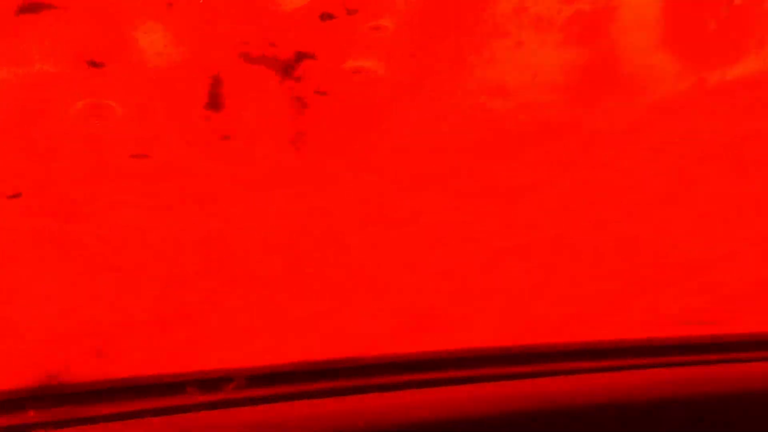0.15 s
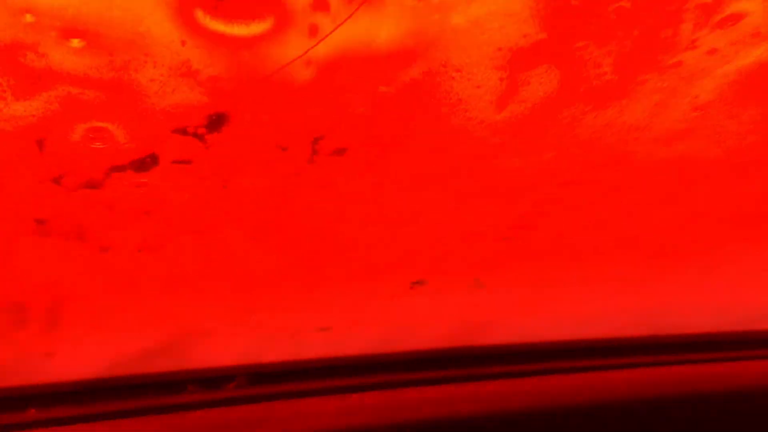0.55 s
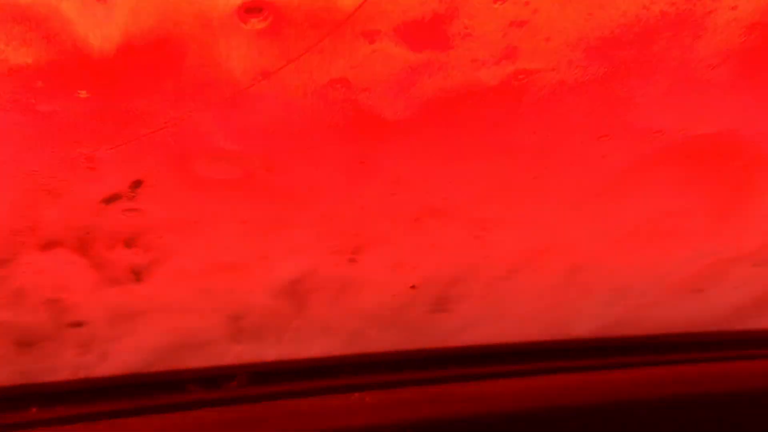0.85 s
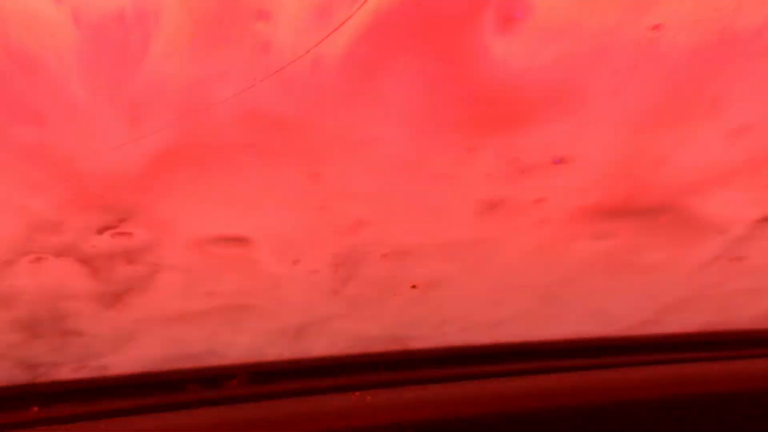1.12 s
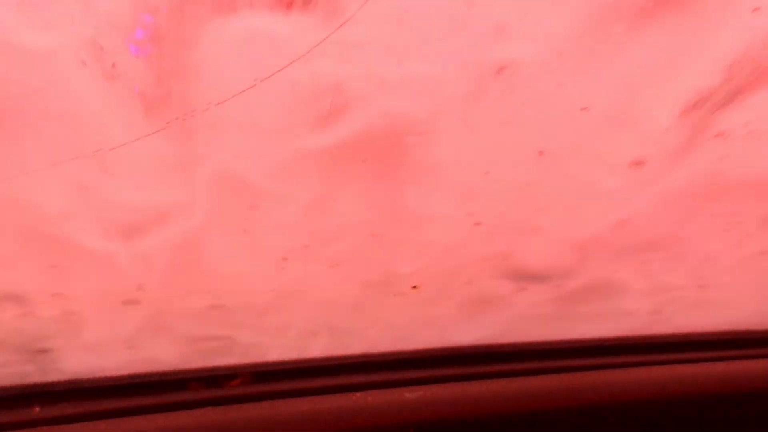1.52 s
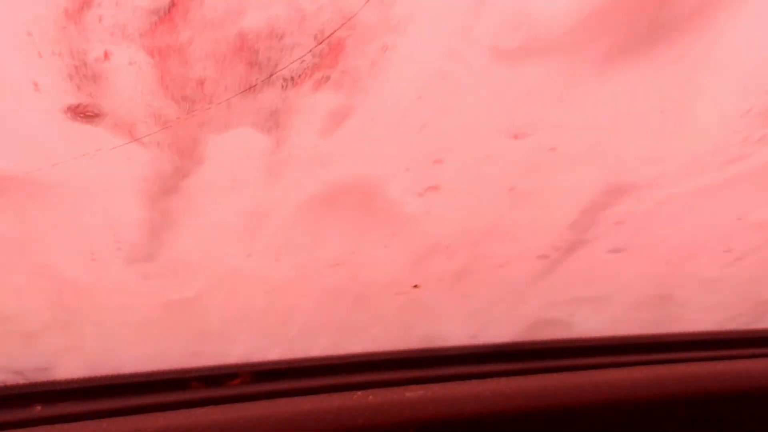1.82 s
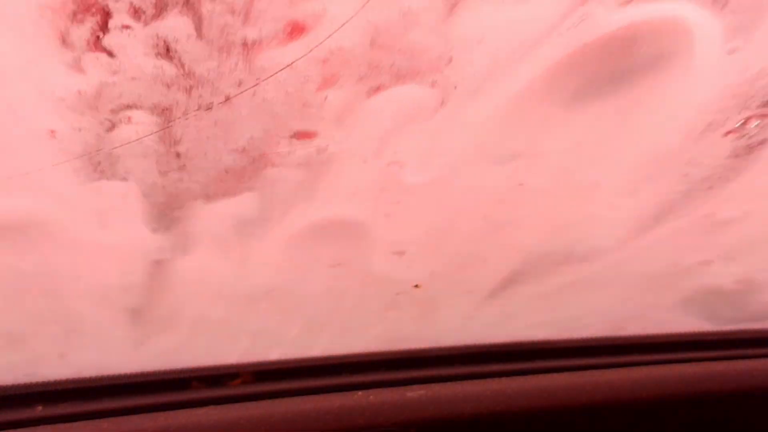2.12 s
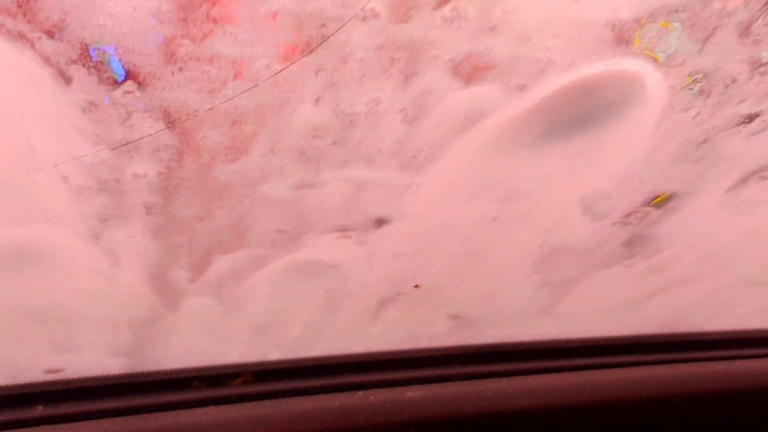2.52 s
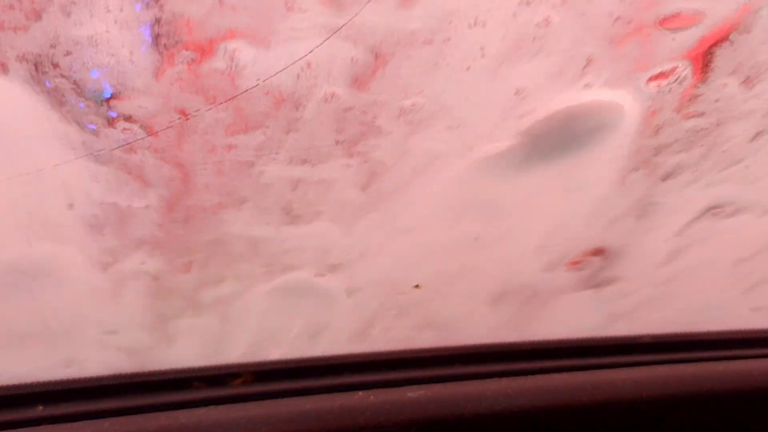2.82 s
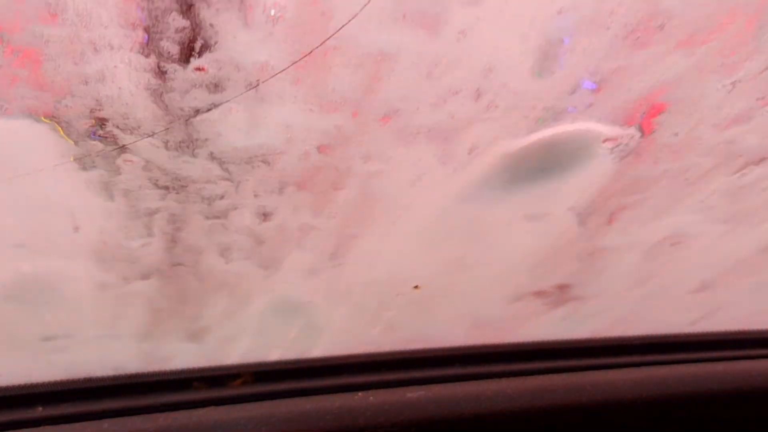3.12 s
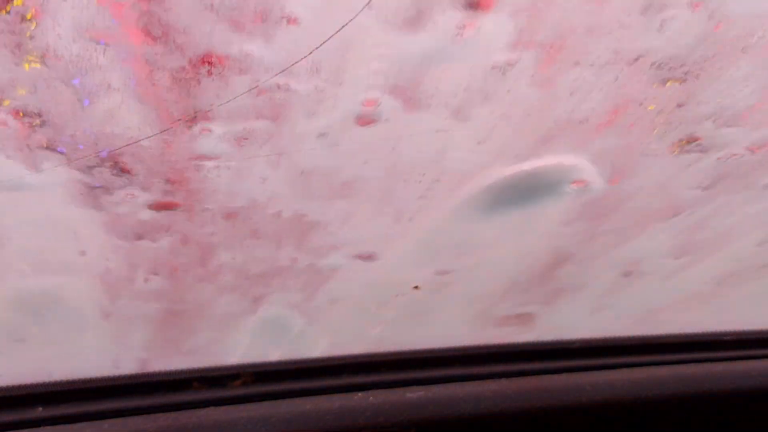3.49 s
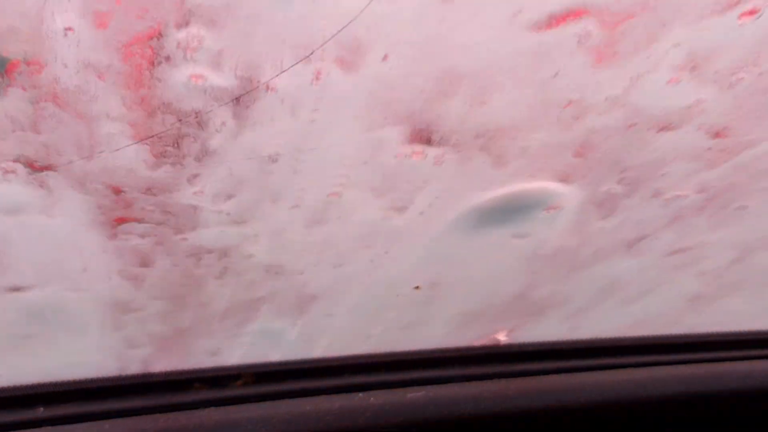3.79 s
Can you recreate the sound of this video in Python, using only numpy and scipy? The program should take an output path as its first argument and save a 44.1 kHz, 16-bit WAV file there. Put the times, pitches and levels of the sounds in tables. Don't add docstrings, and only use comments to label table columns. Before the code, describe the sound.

Car wash machinery rumbles low around a closed cabin while foam and water patter on the windscreen

```python
import sys
import numpy as np
from scipy import signal
from scipy.fft import rfft, irfft
from scipy.io import wavfile
from scipy.ndimage import uniform_filter1d

SR = 44100
rng = np.random.default_rng(int(sys.argv[2]) if len(sys.argv) > 2 else 0)


def linear_from_db(decibels):
    return 10 ** (np.asarray(decibels, float) / 20)


def transcribe(u):
    v = np.clip(np.atleast_2d(u).T, -1, 1)
    q = np.round(v * 32767).astype(np.int16)
    wavfile.write(sys.argv[1], SR, q)


N = 174195

# [t/s, rumble level/dB, spray level/dB]
MACHINERY = [(0.0, -41.5, -57.5), (0.45, -40, -58.5), (0.85, -40.5, -59.5), (1.2, -41.5, -59),
             (1.43, -39, -58.5), (1.462, -46.5, -58.5), (1.485, -38.5, -58.5), (1.95, -39, -57),
             (2.22, -40, -56), (2.5, -39.5, -57), (2.75, -39, -58), (2.9, -38, -57.5), (3.16, -40, -57),
             (3.23, -38, -56), (3.6, -38.5, -57.5), (3.95, -37.5, -57.5)]
# [f/Hz, level per Hz/dB]
BODY_COLOUR = [(8.8, -32), (15, 6), (32, 1), (92, -3), (188, -2.5), (430, -11.5), (471, -13), (566, -17.5),
               (1200, -30), (1560, -29), (2640, -120)]
# [f/Hz, width/Hz, level/dB]
CABIN_BOOMS = [(27.4, 8.5, -1), (39, 2.3, -5), (62, 26, 1.5), (178, 14.5, 2.5), (251, 72, 5), (780, 4.8, 0),
               (1500, 800, 2.5)]
# [f/Hz, level per Hz/dB]
SPRAY_COLOUR = [(300, -11), (700, 1.5), (1600, -8), (2000, -14.5), (3800, -15.5), (6500, -25.5),
                (10000, -27.5), (14500, -35.5)]
# [t/s, level/dB]
MIST_LEVEL = [(0.0, -62.5), (0.79, -68.5), (1.8, -71.5), (2.3, -73), (2.8, -73), (3.3, -75), (3.95, -72)]
# [t/s, peak level/dB, pitch f/Hz, pan/dB]
FOAM_SPLATS = [(1.0071, -48, 1670, 4), (1.0883, -41.5, 1240, 2), (1.2024, -45, 2280, 4),
               (1.355, -47.5, 3400, -4), (1.4982, -50.5, 4330, 5), (1.6042, -44, 4360, 9),
               (1.866, -45.5, 2400, 2), (1.927, -39.5, 2760, 7), (2.0916, -60, 2400, 2),
               (2.1176, -47, 3020, 4), (2.1579, -44.5, 3370, 2), (2.195, -50, 3500, 5),
               (2.243, -42, 3260, 0), (2.2972, -43, 2270, 4), (2.2822, -50, 1700, 3), (2.32, -47, 3070, 6),
               (2.355, -47, 1700, 4), (2.387, -37, 3420, 1), (2.453, -46, 1800, 6), (2.6479, -50, 1700, 3),
               (2.7018, -47, 2800, -1), (2.7342, -45.5, 1980, 5), (2.68, -41.5, 2720, 1),
               (2.772, -49, 3200, 5), (2.806, -41, 2700, 1), (2.864, -40.5, 2250, 2),
               (2.8984, -46, 1700, 1), (2.934, -45, 2130, -2), (2.9582, -41, 3700, 2),
               (3.0378, -43.5, 4050, 2), (3.16, -42.5, 2450, 5), (3.1951, -44.5, 2120, 12),
               (3.229, -35.5, 3460, 0), (3.2715, -38.5, 3160, 5), (3.3337, -46, 2100, 3),
               (3.3876, -38, 2100, 6), (3.363, -49, 4500, 4), (3.4263, -36.5, 2840, 2),
               (3.4427, -45, 3050, 7), (3.479, -44, 1700, 7), (3.5254, -51, 2540, 4),
               (3.5984, -44.5, 3230, 3), (3.658, -35.5, 3880, 3), (3.7159, -47, 2100, 6),
               (3.7414, -47, 1940, 2), (3.77, -53, 1500, 3), (3.8368, -47.5, 3300, 4)]
# [t/s, peak level/dB, pan/dB]
DROPLET_TICKS = [(1.502, -45, 16), (1.6053, -45, 10), (1.928, -42, 15), (2.001, -38.5, 21.5),
                 (0.1605, -45, 8), (0.66, -48, 14), (0.9428, -46, 10), (1.993, -43, 13), (2.0666, -44, 11),
                 (2.132, -52, 14), (2.2189, -55, 12), (2.2273, -47, 14), (2.2355, -43, 16),
                 (2.316, -38, 13), (2.325, -42, 13), (2.386, -54, 6), (2.4319, -47, 15),
                 (2.4668, -43.5, 13), (2.117, -40.5, 20), (2.1579, -31.5, 21), (2.1938, -43, 12),
                 (2.2427, -34, 19), (2.3036, -38.5, 15), (2.5401, -45, 19), (2.7032, -43.5, 16),
                 (2.7331, -49, 7.5), (2.7995, -57, 7.5), (2.6728, -48, 8), (2.9572, -47, 9),
                 (2.983, -44, 11), (3.1038, -51, 8), (3.1592, -46, 14), (3.197, -45, 12), (3.308, -53, 12),
                 (3.205, -38, 15), (3.2285, -54, 8), (3.2719, -50, 13), (3.294, -43, 14), (3.363, -48, 17),
                 (3.3861, -50, 10), (3.4436, -46, 12), (3.427, -44, 14), (3.5202, -45, 15),
                 (3.6021, -47, 10), (3.6604, -42.5, 17), (3.68, -45, 12), (3.7827, -47, 13),
                 (3.8112, -49, 9), (3.9215, -53, 12), (3.928, -46, 16)]
# [t/s, peak level/dB]
GLASS_SNAPS = [
    (3.2048, -39),
    (3.363, -39),
    (2.2435, -44),
    (3.2944, -46),
    (3.2295, -47),
    (1.927, -46),
    (3.66, -46),
    (3.7835, -48),
]
# [t/s, level/dB, f/Hz]
BRUSH_THUDS = [
    (2.06, -34, 32.7),
    (2.271, -38, 27.3),
    (2.489, -31, 28.3),
    (2.721, -29.5, 37.4),
    (2.962, -32, 36.8),
    (3.152, -30.5, 35.6),
    (3.373, -33, 34.3),
    (3.701, -35, 46),
]
# [f/Hz, rms level/dB, width/Hz, pan/dB]
PUMP_TONES = [(469.2, -55.5, 0.9, 14.5), (477, -61, 6.13, 11), (821, -69, 2.9, -2)]
# [t/s, level/dB]
PUMP_LOAD = [(0.0, -61), (0.37, -50.5), (0.46, -55), (0.6, -56.5), (0.95, -50.5), (1.13, -59.5),
             (1.4, -51.5), (1.7, -54.5), (2.05, -61.5), (2.21, -49.5), (2.4, -51), (2.6, -56),
             (3.15, -55.5), (3.53, -56.5), (3.74, -51), (3.88, -55.5), (3.95, -54)]
# [start t/s, end t/s, f/Hz, left level/dB, right level/dB]
WHISTLE_TONES = [
    (0, 3.95, 13028, -88, -91),
    (1.35, 1.76, 11730, -97, -79),
    (1.82, 2.0, 11730, -97, -80),
    (2.3, 2.9, 10390, -98, -83),
]
# [f/Hz, likeness/0-1]
LIKENESS = [(30, .99), (170, .96), (300, .76), (550, .4), (1100, .45), (2200, .35), (4500, .12),
            (14000, .08)]
# [f/Hz, level/dB]
BALANCE = [(30, 3.5), (130, -1), (380, 1.5), (600, -2), (1400, 4.5), (3000, 3), (6500, 1.5), (14000, -2.5)]
# [f/Hz, phase/rad]
PORT_LAG = [(30, 0), (250, .05), (650, .5), (900, 2.8), (1100, 3.3), (1700, 6.3), (2300, 6.3), (3800, 12.6)]
# [f/Hz, width/Hz, level/dB]
PORT_RESONANCES = [(8770, 1750, 13.5), (11300, 3300, 6)]


def evened(x):
    return x / np.sqrt(np.mean(x ** 2) + 1e-20)


def peaked(x):
    return x / abs(x).max(axis=1, keepdims=True)


def pan(db):
    return linear_from_db(np.array([[0.5], [-0.5]]) * db)


def read(points, hz):
    f, value = np.transpose(points)
    return np.interp(np.log(hz + 1), np.log(f + 1), value)


def control(table, t, order):
    columns = np.transpose(table)
    return np.interp(t, columns[0], columns[order])


def add(mix, s, sound):
    part = mix[:, round(s * SR):][:, :sound.shape[1]]
    part += sound[:, :part.shape[1]]


def bump(hz, centre_hz, width_hz, db):
    return 1 + (linear_from_db(db) - 1) / (1 + (2 * (hz - centre_hz) / width_hz) ** 2)


def ring(x, hz, width_hz):
    turn = np.exp(2j * np.pi * hz * np.arange(x.shape[-1]) / SR)
    decay = np.exp(-np.pi * width_hz / SR)
    return 2 * (turn * signal.lfilter([1 - decay], [1, -decay], x / turn)).real


def band(x, hz, width_hz):
    return ring(ring(x, hz, width_hz), hz, width_hz) * np.sqrt(SR / (4 * width_hz))


def noise(colour, size, patchy_db, flicker_db):
    frames, hz = 4 * N // size + 5, np.fft.rfftfreq(size, 1 / SR)
    a, b, c, d, patches = rng.standard_normal((frames, len(hz), 5)).T
    patches = uniform_filter1d(patches, size=10, axis=0)
    patches = evened(uniform_filter1d(patches, size=10, axis=1))
    flicker = evened(uniform_filter1d(rng.standard_normal(frames), size=5))
    same = np.clip(read(LIKENESS, hz), 0, 1)[:, None]
    lean = linear_from_db(read(BALANCE, hz) / 2)[:, None]
    late = np.exp(-1j * read(PORT_LAG, hz))[:, None]
    left = a + 1j * b
    right = same * left * late + np.sqrt(1 - same ** 2) * (c + 1j * d)
    z = np.array([left * lean, right / lean])
    z *= colour(hz)[:, None] * linear_from_db(patchy_db * patches + flicker_db * flicker)
    return evened(signal.istft(z, nperseg=size, noverlap=size * 3 // 4)[1][:, :N])


def rumble():
    def colour(hz):
        muffle_db = 60 * (hz > 1200) * np.log10(hz / 1200 + 1e-9)
        booms = np.prod([bump(hz, *b) for b in CABIN_BOOMS], axis=0)
        return linear_from_db(read(BODY_COLOUR, hz) - muffle_db) * booms * (hz > 12)

    level = linear_from_db(control(MACHINERY, np.arange(N) / SR, order=1) + 2.5)
    return level * noise(colour, size=4096, patchy_db=-0.38, flicker_db=0.07)


def spray():
    def on_glass(hz):
        return linear_from_db(read(SPRAY_COLOUR, hz)) * (hz > 300)

    def far(hz):
        return 1 / (1 + (7000 / (hz + 1)) ** 4)

    t = np.arange(N) / SR
    hiss = noise(on_glass, size=512, patchy_db=1.7, flicker_db=0.5)
    mist = noise(far, size=512, patchy_db=1.1, flicker_db=0.3)
    return linear_from_db(control(MACHINERY, t, order=2) + 7.0) * hiss + linear_from_db(control(MIST_LEVEL, t, order=1) + 1.5) * mist


def burst(t60, tail_db, tail_t60):
    t, rise_s = np.arange(4400) / SR, 0.00021
    decay = linear_from_db(-60 * t / t60) + linear_from_db(tail_db - 60 * t / tail_t60)
    shape = (1 - np.exp(-t / rise_s)) * decay
    x = rng.standard_normal((3, len(t)))
    ragged = linear_from_db(2.7 * evened(uniform_filter1d(rng.standard_normal(len(t)), size=60)))
    return shape * ragged * (x[:2] + 0.5 * x[2])


def splat(db, hz, pan_db):
    patch = band(burst(t60=0.025, tail_db=-14, tail_t60=0.07), hz, width_hz=1230)
    slap = band(burst(t60=0.017, tail_db=-16, tail_t60=0.06), 2940, width_hz=4200)
    return linear_from_db(db) * pan(pan_db) * (peaked(patch) + linear_from_db(-3) * peaked(slap))


def tick(db, pan_db):
    x = burst(t60=0.012, tail_db=-19, tail_t60=0.06)
    puff = peaked(band(x, 8800, width_hz=2500))
    edge = linear_from_db(-13.5) * np.diff(x, axis=1, prepend=0)
    return linear_from_db(db - 8) * pan(pan_db - 11.5) * (puff + edge)


def drops():
    out = np.zeros((2, N))
    for s, *row in FOAM_SPLATS:
        add(out, s, splat(*row))
    for s, *row in DROPLET_TICKS:
        add(out, s, tick(*row))
    return out


def snaps():
    out, t = np.zeros((2, N)), np.arange(300) / SR
    for s, db in GLASS_SNAPS:
        click = np.diff(rng.standard_normal((2, len(t))), axis=1, prepend=0) * linear_from_db(-60 * t / 0.0065)
        add(out, s, linear_from_db(db + np.array([[0], [-9]])) * click)
    return out


def thuds():
    out, t, swell_s = np.zeros((2, N)), np.arange(-0.15, 0.15, 1 / SR), 0.021
    for s, db, hz in BRUSH_THUDS:
        rock = np.exp(-(t / swell_s) ** 2) * np.sin(2 * np.pi * hz * t)
        add(out, s + t[0], linear_from_db(db) * pan(1.6) * rock)
    return out


def patter():
    out, hits_per_s, spread_db = np.zeros((2, N)), 320, 3.0
    for hz in np.geomspace(1200, 8800, num=10):
        hits = rng.random(N) < hits_per_s / 10 / SR
        size = hits * linear_from_db(spread_db * np.minimum(rng.exponential(1, N), 3))
        drop = splat(0, hz, 0.37)[:, :1500] * (1800 / hz) ** 0.86
        out += signal.oaconvolve(size[None], drop, axes=1)[:, :N]
    spray_db = control(MACHINERY, np.arange(N) / SR, order=2)
    return linear_from_db(2.74 * (spray_db + 56) - 56.5) * evened(out)


def hum():
    out, t = np.zeros((2, N)), np.arange(N) / SR
    for hz, db, width_hz, pan_db in PUMP_TONES:
        drift = np.cumsum(rng.standard_normal(N)) * np.sqrt(2 * np.pi * abs(width_hz) / SR)
        tone = np.sin(2 * np.pi * hz * t + uniform_filter1d(drift, size=800))
        out += linear_from_db(db + 2) * tone * pan(pan_db)
    return out * linear_from_db(control(PUMP_LOAD, t, order=1) + 53.5)


def whistles():
    out, t = np.zeros((2, N)), np.arange(N) / SR
    for start, end, hz, left_db, right_db in WHISTLE_TONES:
        on = np.clip(np.minimum(t - start, end - t) / 0.03, 0, 1)
        out += linear_from_db(np.array([[left_db], [right_db]])) * on * np.sin(2 * np.pi * hz * t)
    return out


def scene():
    return rumble() + spray() + drops() + snaps() + thuds() + patter() + hum() + whistles()


def low_pass(x):
    return signal.sosfilt(signal.butter(12, 14330, fs=SR, output="sos"), x)


def record(dry):
    hz = np.fft.rfftfreq(N, 1 / SR)
    ports = np.array([bump(hz, *p) for p in PORT_RESONANCES]) * np.where(hz < 14350, 1, 0.1)
    mix = irfft(rfft(dry, axis=1) * ports, N, axis=1)
    return low_pass(mix)


dry = scene()
out = record(dry)
transcribe(out)
```